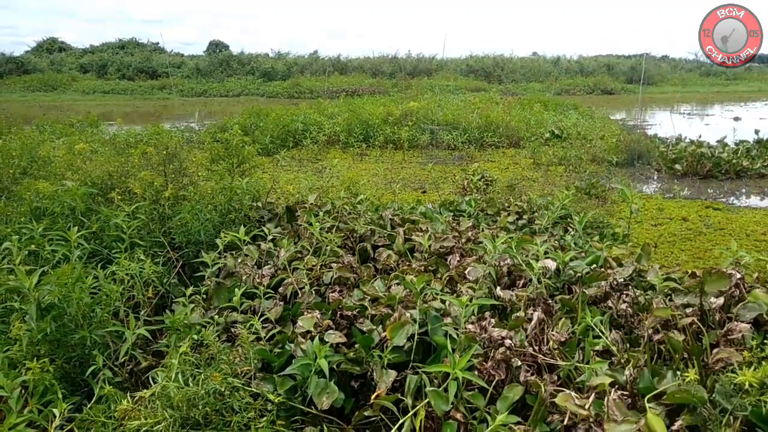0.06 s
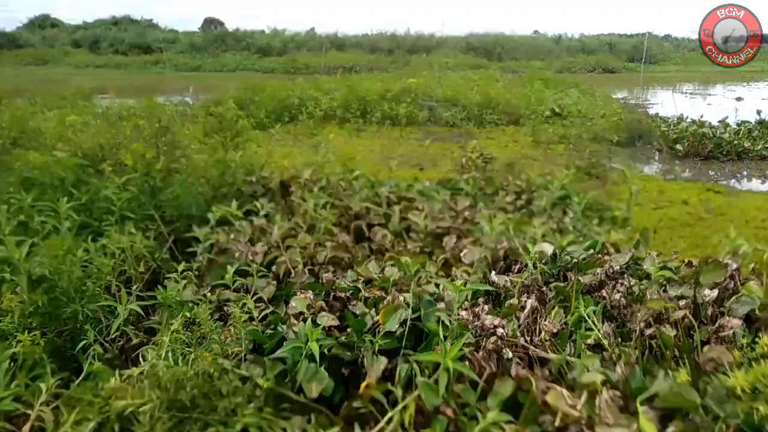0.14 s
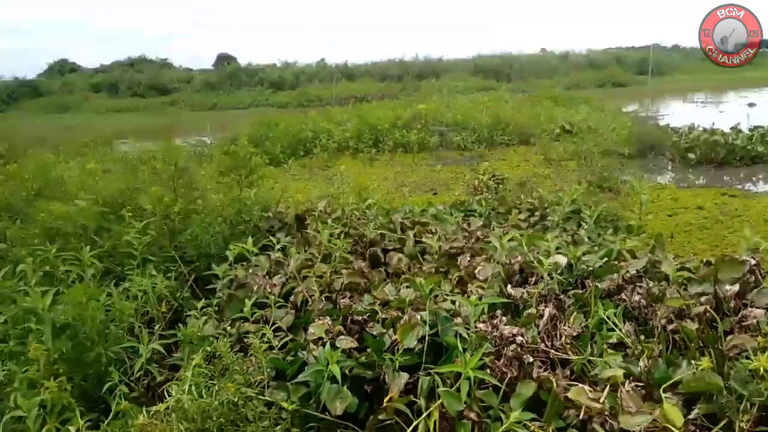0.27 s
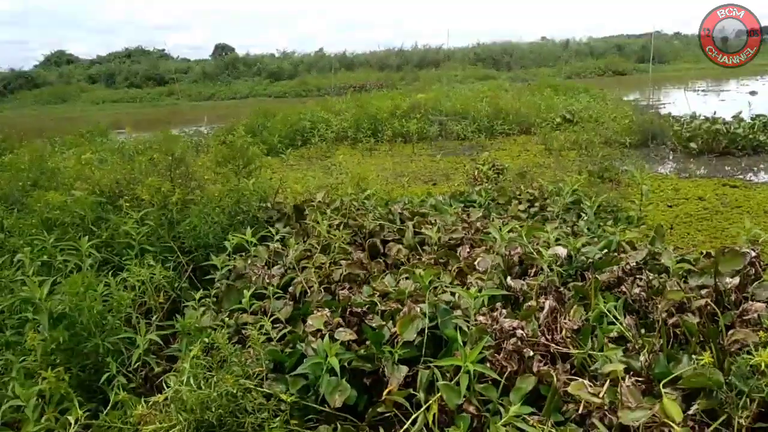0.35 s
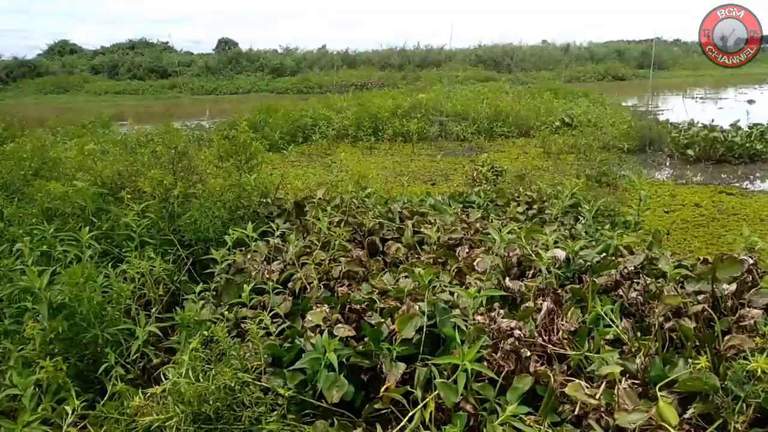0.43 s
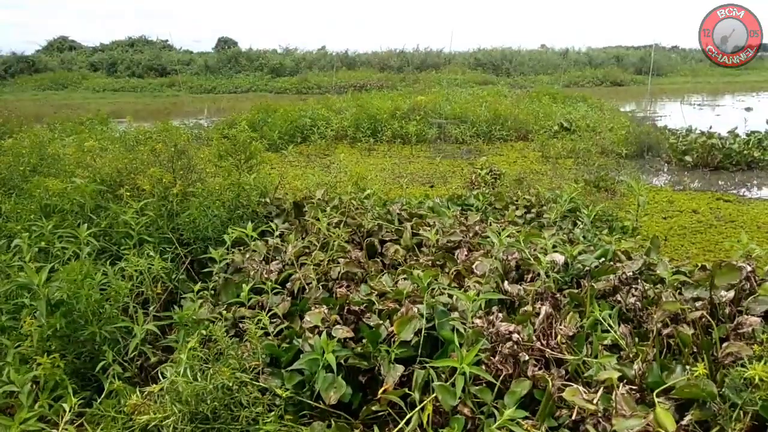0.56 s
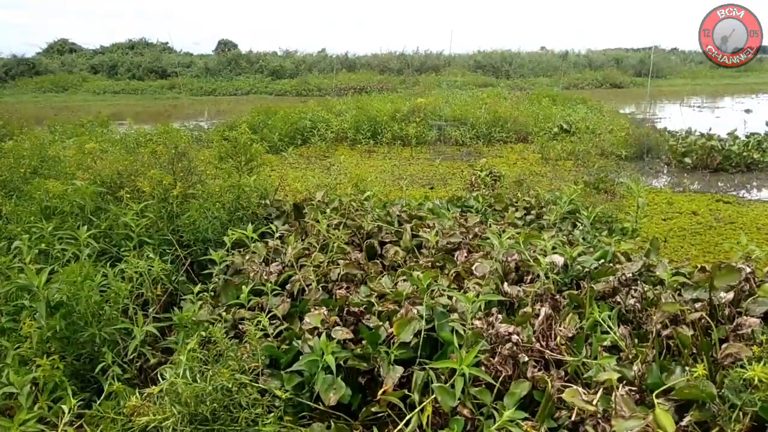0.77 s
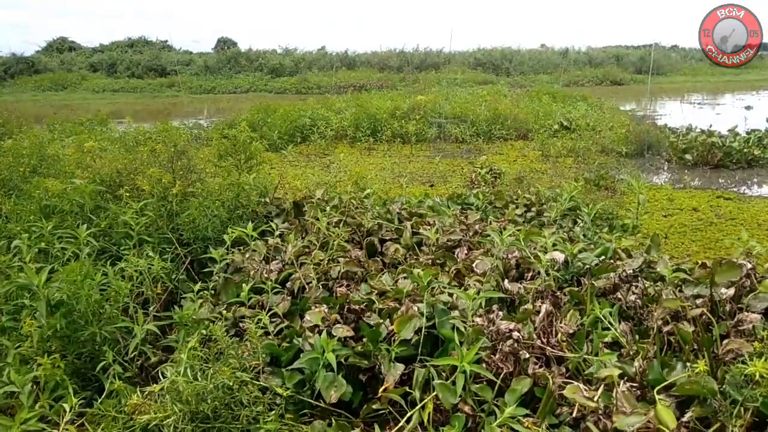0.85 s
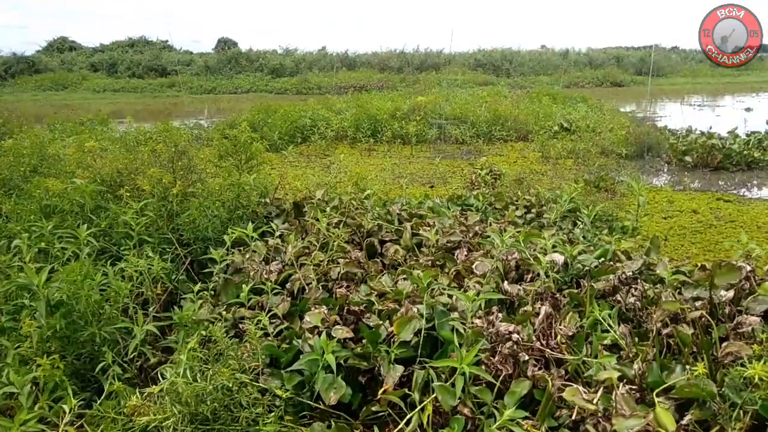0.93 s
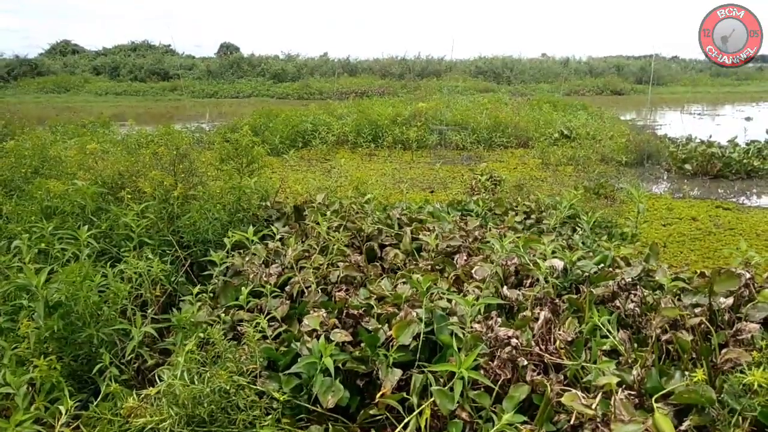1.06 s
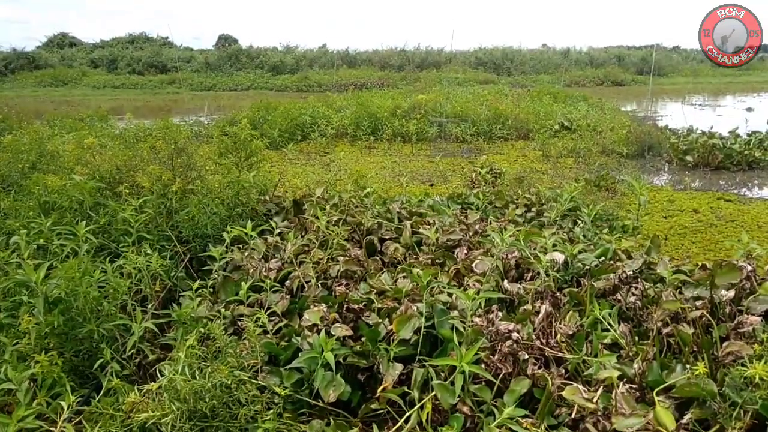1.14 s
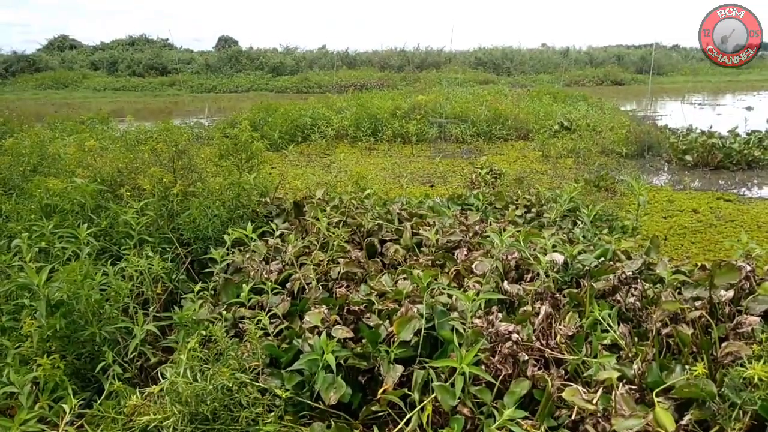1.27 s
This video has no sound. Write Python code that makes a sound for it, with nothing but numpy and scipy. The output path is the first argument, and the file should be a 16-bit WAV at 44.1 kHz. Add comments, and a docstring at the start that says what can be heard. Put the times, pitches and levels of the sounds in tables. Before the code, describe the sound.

Close handling noise: fingers rub and crackle on a camera, its body thumps and its case creaks. The noise settles to a couple of soft bumps, leaving quiet, high-pitched insects chirping in the hush of a marsh.

```python
"""A hand shifts its grip on a camera: the body thumps dully, the plastic case ticks and creaks,
skin rubs, rustles and crackles, and a finger slides off. Two softer bumps follow later.
Each knock is a short push that sets the camera ringing; the rustle is many tiny slips of skin.
Behind it, in an open wetland, three insects make high, pulsing chirps with their wings
over a faint hush, a low rumble and one far-off whistle."""
import sys
import numpy as np
from scipy import signal
from scipy.fft import rfft, irfft
from scipy.io import wavfile
from scipy.ndimage import uniform_filter1d

SR = 44100
rng = np.random.default_rng(int(sys.argv[2]) if len(sys.argv) > 2 else 0)


def to_wav(sig):
    """Store sig (one row per channel, or 1-D mono) as 16-bit WAV at the path in sys.argv[1].

    Samples outside -1..1 are clipped; the rate is SR.
    """
    pcm = np.clip(np.atleast_2d(sig), -1, 1) * 32767
    pcm = np.round(pcm).astype(np.int16)
    wavfile.write(sys.argv[1], SR, pcm.T)  # frames by channels


N = 57330
CASE_TOP_HZ, TOP_HZ = 2650, 15600  # upper edge of the case's woody sound, and of the whole sound


def undb(db):
    """Turn decibels into a number to multiply by."""
    return 10 ** (np.asarray(db) / 20)


def unit(x):
    """Scale a sound to a standard strength (rms 1)."""
    return x / (np.std(x) + 1e-12)


def times():
    """The time of every sample, in seconds."""
    return np.arange(N) / SR


def curve(rows):
    """A changing volume that joins up (t/s, level/dB) points."""
    return undb(np.interp(times(), *np.array(rows).T))


def colour(x, points):
    """Shape the bass and treble of a sound along (f/Hz, level/dB) points, at standard strength."""
    hz, db = np.array(points).T
    freqs = np.maximum(np.fft.rfftfreq(N, 1 / SR), 1)
    gain = undb(np.interp(np.log(freqs), np.log(hz), db))
    return unit(irfft(rfft(x) * gain, N))


def burst(start, attack, decay):
    """A volume that rises in a straight line, then dies away."""
    t = times() - start
    return np.clip(t / attack, 0, 1) * np.exp(-np.maximum(t - attack, 0) / decay)


def wavering_tone(hz, width_hz):
    """A thin tone whose pitch wanders around its centre."""
    wander = unit(uniform_filter1d(rng.standard_normal(N), int(SR / width_hz / 2)))
    pitch = hz + .5 * width_hz * wander
    return unit(np.sin(2 * np.pi * np.cumsum(pitch) / SR))


# How strong the outdoor air sounds, from bass to treble: f/Hz, level/dB
HUSH_COLOUR = [(25, -21), (60, 1), (110, 5), (250, -16), (500, -12), (1000, -13.5), (2200, -17.5),
               (3500, -23), (6500, -31.5), (10000, -31.5), (12200, -36.5), (15500, -37)]


def hush():
    """Steady outdoor noise: a low rumble with a faint hiss above it."""
    return undb(-61.5) * colour(rng.standard_normal(N), HUSH_COLOUR)


def whistle(start=.92, length=.2, hz=3350, db=-79.5):
    """One thin, far-off whistle swells and fades."""
    swell = np.sin(np.pi * np.clip((times() - start) / length, 0, 1))
    return undb(db) * swell * wavering_tone(hz, width_hz=40.4)


def chirp(start, length, hz, pulse_hz, arch_hz, crest, sharp, rough_db, wander_hz):
    """Wing strokes pulse a high tone that swells and fades; effort lifts its pitch by up to arch_hz."""
    t = times() - start
    effort = np.sin(np.pi * np.interp(t / length, [0, np.clip(crest, .05, .95), 1], [0, .5, 1]))
    stroke = np.clip(t * pulse_hz, 0, 31)
    size, detune = rng.standard_normal((2, 32))[:, stroke.astype(int)]  # no two strokes are alike
    pulses = np.abs(np.sin(np.pi * stroke)) ** sharp * undb(rough_db * size)
    pitch = hz + arch_hz * effort + wander_hz * detune
    return np.sqrt(np.abs(effort)) * pulses * np.sin(2 * np.pi * np.cumsum(pitch) / SR)


# When the nearest insect starts each chirp: t/s
NEAR_STARTS = [-.003, .111, -0.13, 0.42, -0.45, .544, .657, .776, 0.99, .990, 1.102, 1.211]
# When a fainter, lower insect starts each chirp: t/s
FAINT_STARTS = [0.013, .14, .25, .352, 0.465, 0.58, 0.691, .812, 0.916, 1.031, 1.158, 1.273]


def insects():
    """Three insects chirp at their own pace; the leaves scatter the sound briefly."""
    near = sum(chirp(start, length=.035, hz=7750, pulse_hz=120, arch_hz=225,
                     crest=.6, sharp=1, rough_db=2.5, wander_hz=60) for start in NEAR_STARTS)
    faint = sum(chirp(start, length=.043, hz=7570, pulse_hz=127, arch_hz=30.2,
                      crest=.19, sharp=2, rough_db=-.5, wander_hz=55) for start in FAINT_STARTS)
    # The highest insect keeps an even beat; each chirp swells and stops short.
    high_starts = np.arange(-.05, N / SR, .1225)
    high = sum(chirp(start, length=.102, hz=9260, pulse_hz=136, arch_hz=0,
                     crest=.95, sharp=3.9, rough_db=-2, wander_hz=38.4) for start in high_starts)
    t = times()  # the near insect slowly gets quieter, the high one louder
    direct = undb(-61.5 - 5 * t) * near + undb(-69.5) * faint + undb(-72 + 4 * t) * high
    leaves = rng.standard_normal(N) * burst(0, attack=.0027, decay=.016)
    return direct + undb(-8) * signal.fftconvolve(direct, leaves / np.linalg.norm(leaves))[:N]


def slips(per_second=4000, spread_db=2.5):
    """Skin makes many tiny slips, a few much stronger than the rest."""
    slipping = rng.random(N) < per_second / SR
    return slipping * rng.standard_normal(N) * undb(spread_db * np.minimum(rng.exponential(size=N), 4))


# How loud the grip rustles as the pressure changes: t/s, level/dB
RUSTLE_LEVELS = [(0, -54.5), (.04, -72), (.12, -63), (.16, -54.5), (.20, -48.5), (.25, -41.5), (.29, -52),
                 (.39, -51), (.43, -67), (.6, -71.5)]
# The rustle from bass to treble: f/Hz, level/dB
RUSTLE_TONE = [(300, 8.5), (700, -6), (1600, -1), (2450, 0.5), (3100, -4), (7500, -9.5), (10800, -9),
               (15000, -28)]


def rustle(fine_limit_db=-55, flicker_db=2.5, flicker_s=.005):
    """Slips come in fits: the woody part grows with pressure, the fine crackle soon levels off."""
    out, pressure = 0, curve(RUSTLE_LEVELS)
    fine = np.minimum(pressure, undb(fine_limit_db))
    bands = [(200, CASE_TOP_HZ, pressure), (CASE_TOP_HZ, TOP_HZ / 2, fine), (TOP_HZ / 2, TOP_HZ, fine)]
    for low, high, gain in bands:
        flicker = unit(uniform_filter1d(rng.standard_normal(N), int(flicker_s * SR)))
        band = signal.butter(6, [low, high], "band", fs=SR, output="sos")
        out += signal.sosfilt(band, colour(slips(), RUSTLE_TONE)) * gain * undb(flicker_db * flicker)
    return out


def slide(start=.443, db=-45, from_hz=2003, to_hz=520, slowing_s=.013):
    """A finger drags off the case; the scrape falls in pitch as it slows."""
    speed = np.exp(-np.maximum(times() - start, 0) / slowing_s)
    pitch = to_hz + (from_hz - to_hz) * speed
    return undb(db) * burst(start, slowing_s / 2, slowing_s) * wavering_tone(pitch, width_hz=to_hz)


# Finger brushes: t/s, level/dB, f/Hz, width/Hz, fade/s
FINGER_BRUSHES = [(0.126, -40.5, 303, 200, 0.026), (1.119, -49, 488, 169, 0.012)]


def brushes():
    """Fingers brush the case, each making a hollow puff of low noise."""
    out = 0
    for start, db, hz, width, decay in FINGER_BRUSHES:
        band = signal.butter(2, [hz - width / 2, hz + width / 2], "band", fs=SR, output="sos")
        hollow = unit(signal.sosfilt(band, rng.standard_normal(N)))
        out += undb(db) * hollow * burst(start, attack=.0158, decay=decay)
    return out


# Short scuffs of skin: t/s, level/dB, rise/s, fade/s, treble/dB
SKIN_SCUFFS = [(0.165, -47, 0.00063, 0.0045, 8), (0.178, -43, 0.0064, 0.0052, 2),
               (.291, -50, .002, 0.0056, 4), (0.376, -38.5, 0.00095, 0.0047, 6),
               (.413, -49, 0.00091, .004, 3), (0.4391, -43, 0.0094, 0.0088, -3),
               (0.449, -51.5, 0.00083, 0.0035, 14), (0.483, -50.5, 0.0011, 0.0078, -2.5)]
# Skin on plastic, from bass to treble: f/Hz, level/dB
SKIN_TONE = [(300, 2), (900, 3.5), (2400, 5), (3100, -0.5), (3900, 2), (6500, -12), (10500, -5.5),
             (13500, -29)]


def scuffs(treble_hz=5100):
    """Skin scuffs the case in short strokes, some brighter than others."""
    friction = colour(.5 * unit(slips()) + rng.standard_normal(N), SKIN_TONE)
    dull = signal.sosfiltfilt(signal.butter(2, treble_hz, fs=SR, output="sos"), friction)
    treble = friction - dull
    return sum(undb(db) * burst(start, attack, decay) * (dull + undb(treble_db) * treble)
               for start, db, attack, decay, treble_db in SKIN_SCUFFS)


# Snaps of skin coming unstuck: t/s, level/dB
SKIN_SNAPS = [(.1430, -44.5), (0.2078, -40.5), (0.2333, -37), (0.242, -35), (0.2462, -36), (0.2745, -43.5)]


def crackles(low_cut_hz=3350):
    """Skin unsticks from the case in separate crisp snaps."""
    snaps = sum(undb(db) * burst(start, attack=1 / SR, decay=.0014) for start, db in SKIN_SNAPS)
    crisp = signal.butter(2, low_cut_hz, "high", fs=SR, output="sos")
    return signal.sosfilt(crisp, snaps * colour(rng.standard_normal(N), SKIN_TONE))


# Creaks of the case: t/s, level/dB, f/Hz, width/Hz, fade/s
CASE_CREAKS = [(0.1891, -40.5, 2326, 450, 0.0068), (0.26, -46, 2259, 595, 0.044),
               (0.352, -45.5, 5200, 1700, 0.0031), (0.3607, -48.5, 4000, 2980, 0.0072),
               (1.1108, -47.5, 2380, 550, 0.006)]


def creaks():
    """The case creaks in short, unsteady tones."""
    return sum(undb(db) * wavering_tone(hz, width) * burst(start, attack=.0012, decay=decay)
               for start, db, hz, width, decay in CASE_CREAKS)


# How loud the hand rubs: t/s, level/dB
RUB_LEVELS = [(0, -72), (.115, -64), (.143, -51), (.175, -46), (.205, -36), (.27, -26.5), (.30, -40),
              (.42, -42.5), (.50, -52), (.64, -64), (.76, -58.5), (.85, -69.5), (1.09, -57.5),
              (1.135, -50.5), (1.21, -62.5)]
# The rubbing from bass to treble: f/Hz, level/dB
RUB_TONE = [(35, -26), (62, 2), (110, -1), (200, 0), (330, -6), (420, -14), (520, -7.5), (660, -25),
            (1000, -20), (4000, -85)]


def rub():
    """The hand rubs the camera, making a low noise that swells and fades."""
    return colour(rng.standard_normal(N), RUB_TONE) * curve(RUB_LEVELS)


def strike(hits, notes, scatter):
    """Each push rings an object's own notes, a little detuned by the grip; longer contact is duller."""
    out, t = np.zeros(N), np.arange(N // 4) / SR
    for start, db, contact_ms in hits:
        detunes = 1 + scatter * rng.standard_normal(len(notes))
        ring = sum(undb(note_db) * np.cos(2 * np.pi * hz * detune * t) * undb(-60 * t / ring_s)
                   for (hz, note_db, ring_s), detune in zip(notes, detunes))
        push = np.sin(np.pi * np.minimum(t * 1000 / contact_ms, 1))
        hit = signal.fftconvolve(ring, push)[:len(t)]
        first = int(start * SR)
        out[first:first + len(t)] += (undb(db) * hit / np.abs(hit).max())[:N - first]
    return out


# Taps on the plastic case: t/s, level/dB, contact/ms
CASE_TAPS = [(.2327, -16, 0.33), (.2460, -21.5, 0.26), (.2469, -12.5, 0.18), (1.1115, -49, 0.62)]
# Notes the case rings at: f/Hz, level/dB, time to fade by 60 dB/s
CASE_NOTES = [(1130, -7, 0.017), (1590, 10.5, 0.0033), (1980, 5.5, 0.0036), (2440, 7, 0.011),
              (2617, 1.5, 0.015)]


def ticks():
    """Quick taps ring the plastic case; cutting the treble leaves a woody tick."""
    woody = signal.butter(10, CASE_TOP_HZ, fs=SR, output="sos")
    return signal.sosfilt(woody, strike(CASE_TAPS, CASE_NOTES, scatter=.034))


# Bumps on the camera body: t/s, level/dB, contact/ms
BODY_BUMPS = [(.2045, -23, 1.67), (.2215, -35, 1.6), (.2465, -25.5, 0.73), (.2565, -21.5, 3.54),
              (.2625, -17.5, 1.27), (.2657, -16.5, 2.35), (.2955, -25.5, 4.34), (.3135, -30, 8),
              (.3375, -27, 3.45), (.3985, -29.5, 2.53), (.5205, -44.5, 5.8), (.594, -45, 5.7),
              (.7385, -38.5, 4.7), (1.1115, -45.5, 0.94), (1.117, -36.5, 4.6), (1.158, -37.5, 5.2)]
# Low notes the held body rings at: f/Hz, level/dB, time to fade by 60 dB/s
BODY_NOTES = [(80, -5, 0.14), (125.8, 0, 0.066), (204, -3, 0.087), (262.5, -3.5, 0.078), (304, 4, 0.032),
              (465, 2, 0.05), (525, -14.5, 0.16)]


def thumps():
    """Soft bumps of the hand ring the camera body, low and dull."""
    return strike(BODY_BUMPS, BODY_NOTES, scatter=.018)


def scene():
    """The wetland behind and the hand on the camera close up, in one channel."""
    wetland = hush() + whistle() + insects()
    skin = rustle() + slide() + brushes() + scuffs() + crackles() + rub()
    camera = creaks() + ticks() + thumps()
    return (wetland + skin + camera)[None]


def record(dry):
    """The recorder cuts the deepest bass and the highest treble."""
    thin = signal.sosfilt(signal.butter(6, 48, "high", fs=SR, output="sos"), dry)
    return signal.sosfilt(signal.ellip(10, .2, 70, TOP_HZ, fs=SR, output="sos"), thin)


dry = scene()
out = record(dry)
to_wav(out)
```